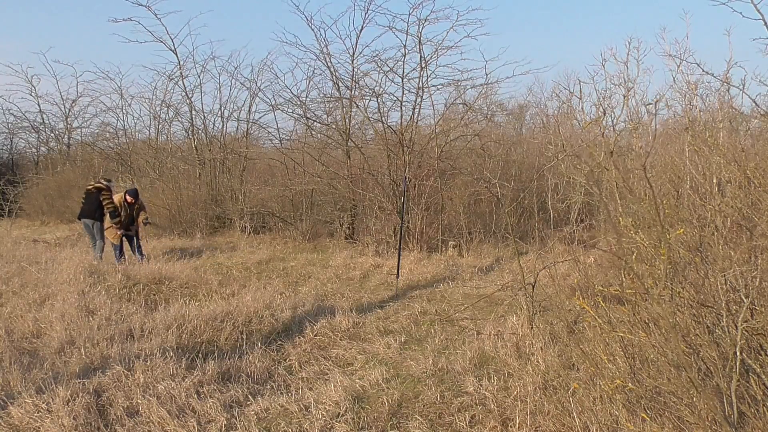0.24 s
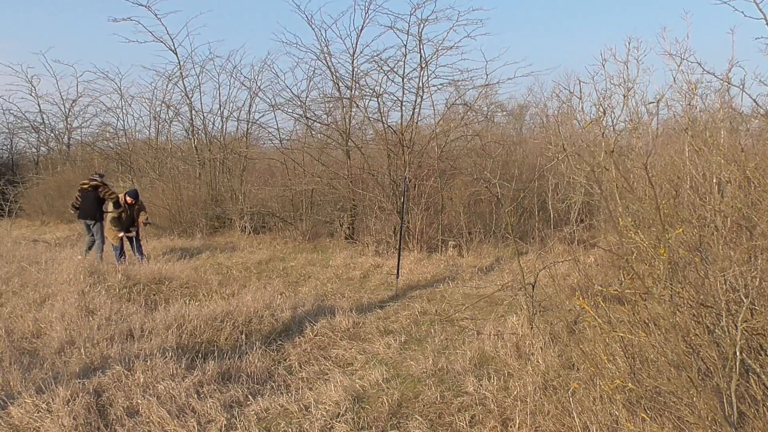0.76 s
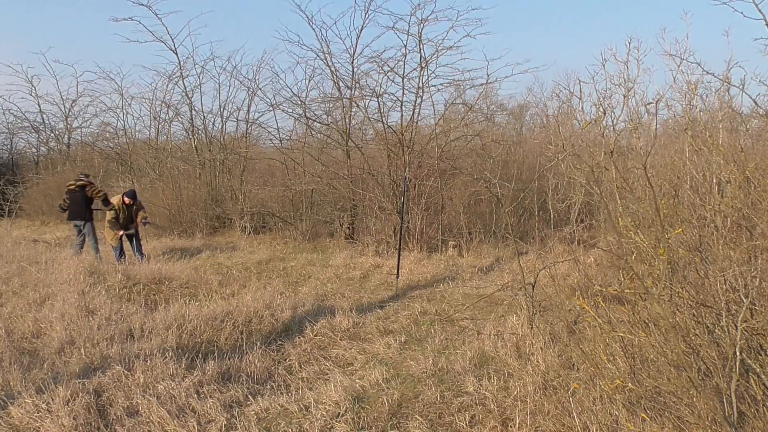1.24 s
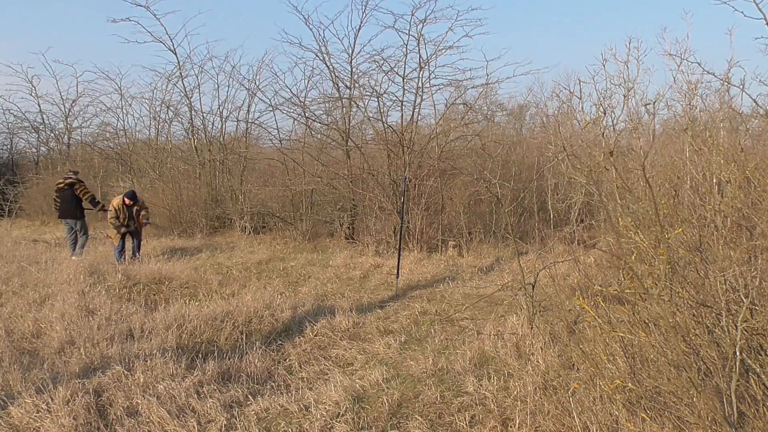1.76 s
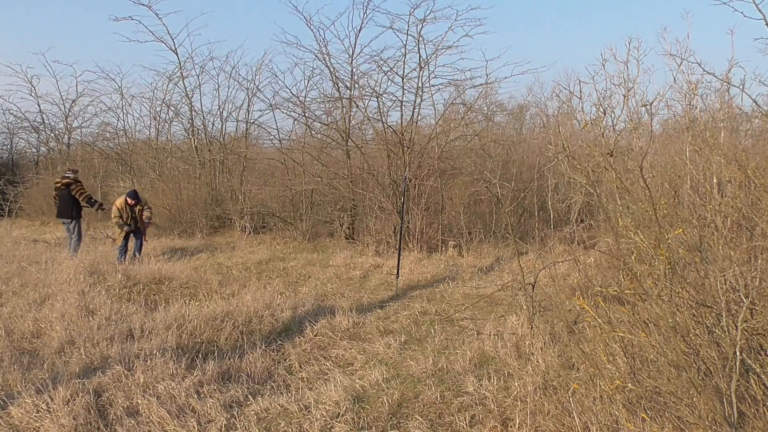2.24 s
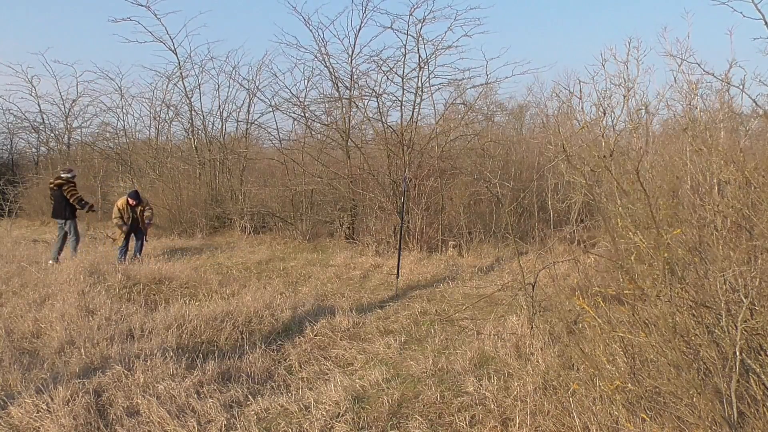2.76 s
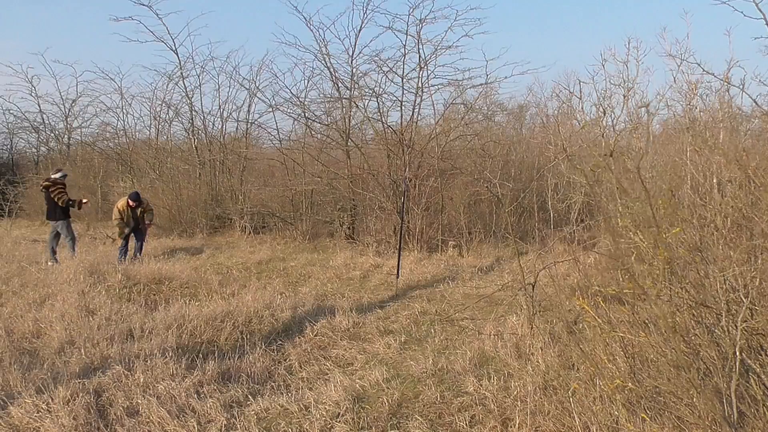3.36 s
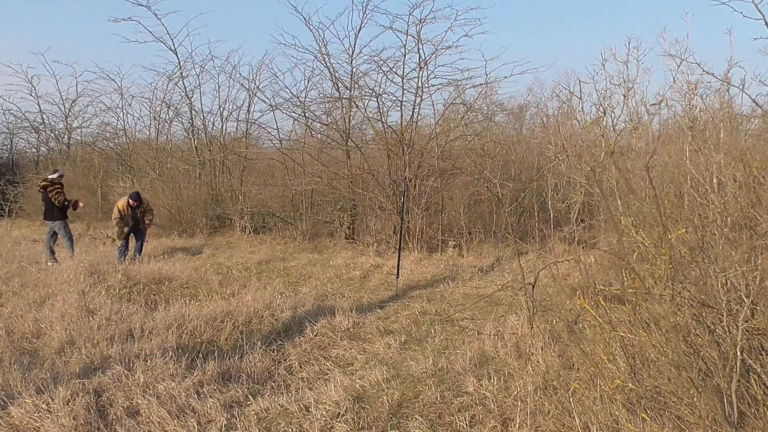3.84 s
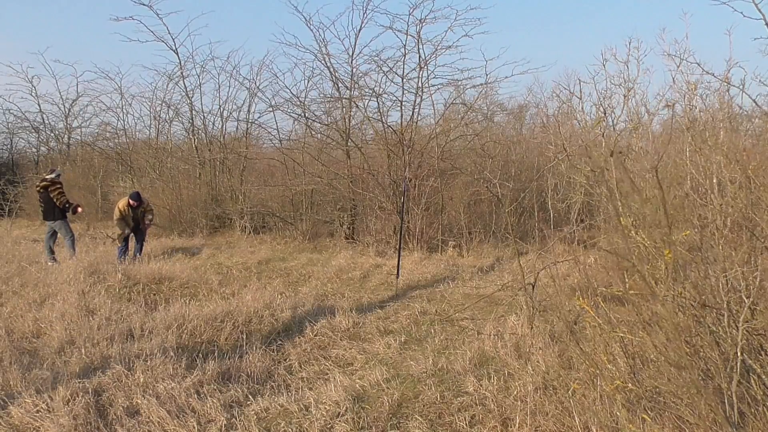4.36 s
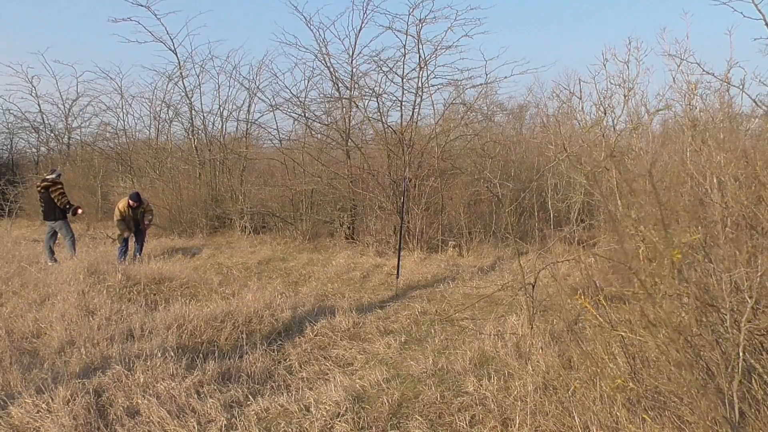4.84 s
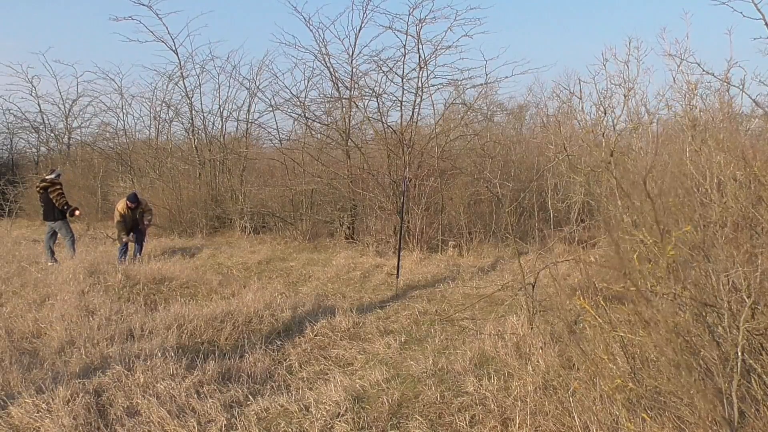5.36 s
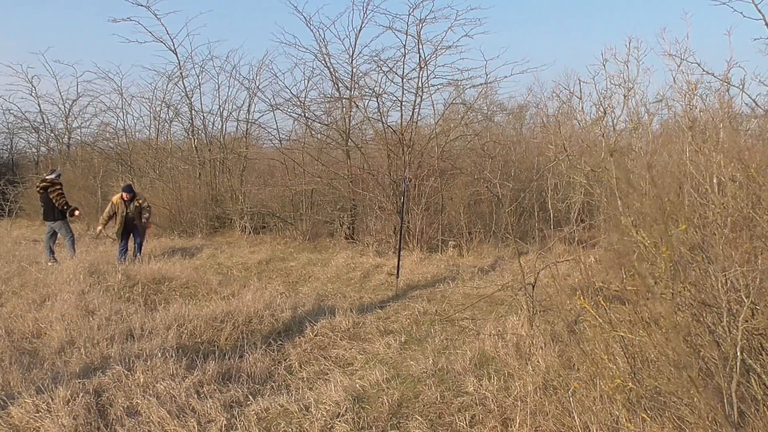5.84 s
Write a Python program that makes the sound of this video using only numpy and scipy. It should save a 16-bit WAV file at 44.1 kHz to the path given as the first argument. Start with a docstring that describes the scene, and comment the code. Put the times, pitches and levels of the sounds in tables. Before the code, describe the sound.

Steady metallic hammering outdoors: one very faint tap, then a dozen or so hard clanks roughly half a second apart, some with a quick bounce. Every clank rings for a fraction of a second and fades into the bushes. Soft distant roar, light grass rustle and faint hiss lie beneath. In the second half, wind pummels the microphone with lumpy low thuds and flaps, and the stereo narrows towards mono.

```python
"""Hammer on an iron stake in a windy field

A hammer drives an iron stake in a dry field some metres left of a camera: filtered noise bursts make crack
and knock, decaying sines make the ring, and scrub behind scatters each blow as a fading noise tail.
Shaped noise makes the wind buffeting the microphone ports, a distant roar, hiss and rustling grass;
short resonant puffs make wind slaps and snapping stalks. From 3.3 s on the stereo image narrows, at times
to near mono."""
import sys
import numpy as np
from scipy import signal
from scipy.fft import rfft, irfft, next_fast_len
from scipy.io import wavfile
from scipy.ndimage import uniform_filter1d

SR = 44100
rng = np.random.default_rng(int(sys.argv[2]) if len(sys.argv) > 2 else 0)


def bounce(signal):
    """Save signal as a 16-bit WAV file at the path given by the first command-line argument."""
    frames = np.transpose(np.atleast_2d(signal))
    limited = np.clip(frames, -1, 1)
    pcm = np.round(limited * 32767).astype(np.int16)
    wavfile.write(sys.argv[1], SR, pcm)


N = 268877
T = np.arange(N) / SR
BLOW_T = np.arange(SR * 3 // 8) / SR  # seconds since a blow
STRIKE_RISE = 1 - np.exp(-BLOW_T / .00025)

# Colour of the scattered sound. Each row: frequency in Hz, level in dB.
SCATTER_COLOUR = [(530, -33), (900, 9.5), (1580, -8.5), (2270, -8), (2470, -5.5), (2790, -17.5),
                  (4020, -5.5), (6310, -5), (6700, -8.5), (7480, -2.5), (11200, -9), (15300, -31.5),
                  (16500, -68)]
# How long the scrub holds a blow. Each row: frequency in Hz, time to fall 60 dB in seconds.
SCRUB_DECAY = [(1000, 0.064), (3000, 0.51), (7000, 0.27), (14000, 0.19)]
# Steady wind on the ports under the buffets. Each row: time in seconds, level in dB,
# left-right balance of all wind in dB.
BREEZE_CURVE = [(0, -43.5, -6), (.18, -62.5, -0.5), (.6, -52.5, 0.5), (1.7, -56.5, -6.5), (2.1, -60.5, 3),
                (2.2, -67.5, 3), (3.25, -60, 0), (3.36, -32, -7), (3.9, -37.5, -12.5), (4.3, -38, -6),
                (4.4, -55, -4.5), (4.6, -31, 0), (4.95, -35.5, -11), (5.04, -45, -2), (5.3, -33, -5.5),
                (6.1, -31, -2.5)]


def gain_of(db):
    """Turn decibels into an amplitude factor."""
    return 10 ** (np.asarray(db) / 20)


def evened(x):
    """Scale to an rms of 1."""
    return x / np.sqrt(np.mean(x ** 2) + 1e-20)


def read(points, hz):
    """Read a frequency curve, straight between its points on a log-frequency axis."""
    f, value = np.transpose(points)
    return np.interp(np.log(hz + 1), np.log(f + 1), value)


def curve(rows, t):
    """Read every column of a table of (time, values..) at the times t."""
    s, *columns = np.transpose(rows)
    return [np.interp(t, s, c) for c in columns]


def sides(pan_db):
    """Left and right gains for a left-right level difference."""
    return gain_of(np.array([pan_db / 2, -pan_db / 2]))


def add(mix, s, sound):
    """Mix a sound in at s seconds, cut at the end of the mix."""
    part = mix[:, round(s * SR):][:, :sound.shape[1]]
    part += sound[:, :part.shape[1]]


def resonate(x, modes):
    """Sum of one-pole resonances with alternating signs, each of gain 1 at its centre before its own level."""
    out = 0
    for k, (hz, width, db) in enumerate(modes):
        r = np.exp(-np.pi * width / SR)
        pole = r * np.exp(2j * np.pi * hz / SR)
        out = out + (-1) ** k * gain_of(db) * signal.lfilter([1 - r], [1, -pole], x).real
    return out


def noise(shape, same, size, patchy_db, flicker_db, field_db=None):
    """Two-channel random short-time spectra with drifting patches and per-frame flicker; mid rms 1."""
    hop = size // 4
    frames, hz = N // hop + 5, np.fft.rfftfreq(size, 1 / SR)
    a, b, c, d, patches = rng.standard_normal((frames, len(hz), 5)).T
    patches = uniform_filter1d(patches, size=size // 128 + 1, axis=0)
    patches = evened(uniform_filter1d(patches, size=8, axis=1))
    flicker = evened(uniform_filter1d(rng.standard_normal((2, 1, frames)), size=3, axis=2))
    # the right channel shares the part "same" with the left; the rest is its own
    same = np.clip(same * np.ones(len(hz)), -1, 1)[:, None]
    left = a + 1j * b
    right = same * left + np.sqrt(1 - same ** 2) * (c + 1j * d)
    z = np.array([left, right])
    z *= gain_of(read(shape, hz)[:, None] + patchy_db * patches + flicker_db * flicker)
    if field_db:
        z *= gain_of(field_db(hz[:, None], np.arange(frames) * hop / SR))
    x = signal.istft(z, nperseg=size, noverlap=size - hop)[1][:, :N]
    return x / np.sqrt(np.mean(x.mean(0) ** 2))


def hammer():
    """Every blow and bounce of the hammer, with the level and phase differences between the camera's ports."""
    # The strikes. Each row: start in seconds, crack in dB, lift of its upper resonances in dB, lift of its top
    # ones in dB, second contact in dB against the first, low knock in dB, knock pitch in Hz, scattered tail in
    # dB, then ring in dB of each of the two pure stake modes, of the pure hammer-head mode and of the broad
    # middle pair.
    strikes = [(0.3934, -49, 4, -16, -17, -44.5, 1690, -66, -68, -62, -91, -84),
               (0.7822, -25, 10, 8.5, -7, -31.5, 1460, -36, -43.5, -47, -70, -59),
               (1.1894, -23.5, 11, 12, -1, -28, 1440, -34, -51.5, -52, -43.5, -60),
               (1.6427, -23, 2.5, 5.5, 0, -27.5, 1190, -34.5, -66, -50, -46.5, -60),
               (2.0969, -23, 0, -1, -4.5, -29.5, 1860, -31.5, -61, -58, -57, -49.5),
               (2.587, -23, -1, -2.5, -5, -32, 2200, -31, -50.5, -44.5, -49.5, -57),
               (3.0724, -24, 0, -9, -4, -29.5, 1700, -30.5, -47, -50, -58, -54),
               (3.1192, -25, 7, -10, -22, -48, 1710, -39.5, -77, -69, -66, -55),
               (3.547, -17.5, 10, 5.5, -15, -32.5, 1860, -35.5, -48.5, -51.5, -45, -55.5),
               (3.6356, -43.5, -4, -1.5, -14, -49, 910, -47, -56, -56, -61.5, -68),
               (4.0613, -25.5, 1.5, 0, 0.5, -31.5, 1410, -32, -59, -44, -70, -58),
               (4.5293, -22, 7.5, 6, -0.5, -31, 1530, -31, -48.5, -45.5, -48.5, -55),
               (4.9903, -19.5, 3, 3.5, -11, -35.5, 1430, -31.5, -56, -44, -48, -54),
               (5.4458, -22, 2.5, 1, -6, -29, 1260, -30.5, -72, -50, -54, -51)]
    # Camera body's colour on a source at the left. Each row: frequency in Hz, left-right balance in dB.
    port_balance = [(2200, 4), (3300, 2), (5300, 0), (6400, -1), (7400, 2.5), (9500, 2), (10500, -5),
                    (12000, -9), (14000, -2)]
    # The same for phase. Each row: frequency in Hz, lead of the left port in radians.
    port_phase = [(1000, .2), (4300, .1), (5300, .3), (7400, 1.2), (8400, 1), (10500, .4), (11700, .7),
                  (12600, 2), (16000, 2)]
    out = np.zeros((2, N))
    for s, *levels in strikes:
        add(out, s, blow(*levels))
    size = next_fast_len(N)
    hz = np.fft.rfftfreq(size, 1 / SR)
    lead = np.exp(.5j * read(port_phase, hz) * np.array([[1], [-1]]))
    return irfft(rfft(out, size) * lead * sides(read(port_balance, hz)), size)[:, :N]


def blow(crack_db, upper_db, top_db, echo_db, knock_db, knock_hz, tail_db, *ring_db):
    """One strike: crack and knock at the contacts, then the stake's modes and the scrub's scatter."""
    # a square, hard blow is brighter
    lift = [(5500, 0), (7000, upper_db), (9000, upper_db), (10500, top_db)]
    out = contacts(crack_db, lift, echo_db, knock_db, knock_hz)
    add(out, 0, minor_partials(tail_db))
    return out + ringing(ring_db, tail_db, lift) + scatter(tail_db)


def contacts(crack_db, lift, echo_db, knock_db, knock_hz):
    """Steel meets steel twice, 2.8 ms apart, exciting a bright crack and a duller knock."""
    # Broad resonances of the crack. Each row: frequency in Hz, width in Hz, level in dB before the lift.
    crack_modes = [(4200, 640, 5.5), (5240, 260, 13), (6100, 160, 4), (7570, 300, 14.5), (8310, 820, 7),
                   (9470, 450, 2.5), (11030, 1150, 1), (13100, 1900, -4), (14900, 2300, -17)]
    # Resonances of the knock. Each row: share of the knock pitch, width in Hz, level in dB.
    knock_modes = [(.6, 636, 3), (1.0, 400, 10.5), (1.5, 1570, 2)]
    t = BLOW_T
    burst = rng.standard_normal((3, len(t)))
    spit = burst[0] + 0.5 * burst[1:]  # noise partly shared by both channels
    first = STRIKE_RISE * gain_of(-60 * t / .007)
    later = np.clip(t - .0028, 0, None)
    second = gain_of(echo_db - 60 * later / 0.014) * (1 - np.exp(-later / 0.00008))
    touch = 4 * np.exp(-((t - .0003) / .000022) ** 2)  # the first touch of steel on steel

    steel = [(hz, width, db + read(lift, hz)) for hz, width, db in crack_modes]
    crack = resonate(spit * (first + second) + touch, steel)

    body = [(share * knock_hz, width, db) for share, width, db in knock_modes]
    thud = spit * STRIKE_RISE * gain_of(-60 * t / 0.034)
    knock = resonate(thud + 1.22 * touch + .6 * spit * second, body)
    knock = signal.sosfilt(signal.butter(2, 600, "high", fs=SR, output="sos"), knock)

    # levels are set over the first few milliseconds
    out = gain_of(crack_db) * crack / crack[:, :SR // 250].std()
    return out + gain_of(knock_db) * knock / knock[:, :SR // 170].std()


def ringing(ring_db, tail_db, lift):
    """The decaying modes of stake and hammer head: broad ones are thick clusters of beating partials, narrow
    ones nearly one tone."""
    # Pitches of the modes, in Hz: three pure ones, the broad middle pair, then the rest.
    mode_hz = [1567, 2513, 6106, 4060, 5075, 7598, 10958, 3740, 4360, 8300, 9690, 12468, 14900]
    # Each row, in the same order: level in dB added to the blow's own, time to fall 60 dB in seconds,
    # spread of its close partials in Hz. Modes after the fifth follow tail level and brightness.
    mode_shape = [(7.5, 0.25, 2.3), (-0.5, 0.46, 1.2), (12, 0.17, 4.5), (5.5, 0.34, 19), (5.5, 0.4, 46.5),
                  (-10.5, 0.24, 24), (-8, 0.14, 22), (-25.5, 0.12, 7.7), (-11.5, 0.22, 32), (-21, 0.19, 69),
                  (-22.5, 0.1, 25), (-23, .16, 15), (-39.5, .15, 15)]
    ring_share = 0.85  # part of a blow's brightness felt by the modes after the fifth
    t = BLOW_T
    early = STRIKE_RISE * (1 + 0.44 * np.exp(-t / 0.0026))  # strongest while the hammer head still shakes
    fade = np.clip((t[-1] - t) / .05, 0, 1)
    levels = [*ring_db, ring_db[-1]]
    levels += [tail_db + ring_share * read(lift, hz) for hz in mode_hz[len(levels):]]
    draws, order = rng.random((len(mode_shape), 2, 7, 1)), np.arange(-3, 4)
    out = 0
    for hz, (db, t60, spread), level, (phase, place) in zip(mode_hz, mode_shape, levels, draws):
        partials = hz + spread * (order[:, None] + place - .5)
        weights = np.where(order, min(spread / 30, 1) * 0.66 ** abs(order), 1)
        cluster = weights @ np.sin(2 * np.pi * (partials * t + phase)) / np.linalg.norm(weights)
        out = out + gain_of(level + db - 60 * t / t60) * cluster
    return out * early * fade


def minor_partials(tail_db):
    """Many short, weak partials of hammer head and stake, different at every blow."""
    place, phase, size = rng.random((3, 48, 1))
    hz, t = 3200 + 9500 * place, BLOW_T[:SR // 8]
    db = read(SCATTER_COLOUR, hz) + 12 * size - 60 * t / (0.27 * read(SCRUB_DECAY, hz))
    partials = gain_of(db) * np.sin(2 * np.pi * (hz * t + phase))
    return gain_of(tail_db - 19.5) * STRIKE_RISE[None, :len(t)] * partials.sum(0)


def scatter(tail_db):
    """The scrub's return: patchy noise whose decay time depends on frequency."""
    burst = rng.standard_normal((3, len(BLOW_T)))
    hz, frames, z = signal.stft(burst[0] + 0.83 * burst[1:], SR, nperseg=256)
    # single trunks return uneven patches of the blow
    patches = evened(uniform_filter1d(rng.standard_normal(z.shape[1:]), size=3, axis=1))
    z *= gain_of(read(SCATTER_COLOUR, hz)[:, None] + 3.0 * patches)
    z /= np.sqrt(np.mean(abs(z) ** 2) * len(hz))
    z *= gain_of(-60 * frames / read(SCRUB_DECAY, hz)[:, None])
    tail = signal.istft(z, SR, nperseg=256)[1][:, :len(BLOW_T)]
    return gain_of(tail_db - 7.0) * tail * (1 - np.exp(-BLOW_T / 0.00093))


def wind():
    """All wind on the ports, buffeting and slaps, under one moving left-right balance."""
    out = buffeting()
    add_slaps(out)
    return out * sides(curve(BREEZE_CURVE, T)[1])


def buffeting():
    """Lumpy low turbulence, partly opposed at the two ports, brighter when strong."""
    # Colour of the turbulence before brightness. Each row: frequency in Hz, level in dB.
    air_colour = [(12, -55), (20, -21), (43, -15), (86, -1.5), (226, 1), (508, -16), (544, -19), (583, -18),
                  (1340, -35), (1810, -52.5), (5000, -72), (6500, -91), (11000, -120)]
    # Share of the brightness felt. Each row: frequency in Hz, factor.
    bright_share = [(60, -0.73), (200, 0.26), (500, 0.42), (2000, 0.95)]
    bright_per_db = 0.6252  # dB of brightness per dB of wind

    def brightness(hz, t):
        gust_db, bright_db = gusts(t)
        return read(bright_share, hz) * (bright_db + bright_per_db * (gust_db + 13))

    air = noise(air_colour, -0.4, size=512, patchy_db=0.0, flicker_db=4.5, field_db=brightness)
    # swells longer than about 40 ms are roughly halved in dB, leaving their level more to the gust curve
    lumps = uniform_filter1d(air.mean(0) ** 2, size=SR // 25) + 1e-3
    air = air / lumps ** 0.23
    steps = T[::SR // 500]
    level_db = np.interp(T, steps, gusts(steps)[0])
    return air / air.mean(0).std() * gain_of(level_db)


def gusts(t):
    """Wind level and brightness in dB: the breeze plus buffets that rise, hold and fall."""
    # Each row: start of the hold in seconds, its length in seconds, level in dB, brightness in dB.
    buffet_rows = [(0.25, 0.039, -47.5, -9), (0.399, 0.025, -48, -6.5), (0.44, 0.025, -38, -11.5),
                   (0.658, .03, -50.5, 6), (0.834, 0.028, -47.5, -8), (1.1, 0.033, -51, 2),
                   (1.355, 0.051, -50, -5), (1.495, .05, -45.5, -1.5), (1.805, 0.038, -44, -10),
                   (2.572, 0.027, -38.5, 10), (3.012, 0.046, -38.5, -7), (3.172, 0.023, -47, -21.5),
                   (3.421, 0.02, -15, 10), (3.461, 0.049, -17, -5.5), (3.516, 0.087, -22.5, 1),
                   (3.616, 0.15, -18.5, 7.5), (3.719, .11, -20, 8), (3.838, 0.092, -31.5, -1),
                   (3.934, 0.023, -20.5, 3), (3.964, 0.097, -29, -3), (4.294, .04, -29.5, 4),
                   (4.494, 0.0075, -17.5, -8.5), (4.67, .02, -23, -0.5), (4.741, 0.08, -25.5, 5),
                   (4.951, 0.043, -29.5, 1.5), (5.1, 0.03, -23.5, 0.5), (5.208, 0.022, -23, 5.5),
                   (5.26, 0.03, -16, -5.5), (5.313, 0.041, -22.5, 5), (5.426, 0.098, -25.5, -3),
                   (5.492, .12, -22.5, 6.5), (5.665, 0.02, -40.5, -19), (5.75, 0.075, -22.5, 1.5),
                   (5.846, 0.024, -23, 16), (5.983, .1, -25, -1)]
    rise_s, fall_s = 0.016, 0.014  # time to gain or lose 20 dB before and after the hold
    breeze_bright_db = 2.5
    start, length, db, bright_db = np.transpose(buffet_rows)[:, :, None]
    away = np.maximum(start - t, 0) / rise_s + np.maximum(t - start - length, 0) / fall_s
    power = gain_of(db - 20 * away) ** 2
    breeze = gain_of(curve(BREEZE_CURVE, t)[0]) ** 2
    total = power.sum(0) + breeze
    return 10 * np.log10(total), ((power * bright_db).sum(0) + breeze * breeze_bright_db) / total


def add_slaps(out):
    """Sharp pressure slaps: a one-sided noisy puff through three low resonances."""
    # Each row: start in seconds, peak in dB before the wind's balance.
    slap_rows = [(3.42, -13), (3.435, -15), (3.479, -20), (3.637, -3.5), (3.692, -10.5), (3.754, -15.5),
                 (3.777, -16.5), (3.938, -9.5), (4.489, -21), (4.685, -22), (4.956, -21), (5.106, -26),
                 (5.27, -13), (5.329, -15), (5.505, -14), (5.519, -19), (5.559, -26), (5.759, -21),
                 (5.821, -19), (5.856, -7.5)]
    modes = [(231, 403, -2.0), (538, 275, 5.5), (1120, 430, -13.5)]  # Hz, width in Hz, dB
    soften = signal.butter(4, 2200, fs=SR, output="sos")
    t = np.arange(SR // 20) / SR
    for (s, db), puff in zip(slap_rows, rng.standard_normal((len(slap_rows), 2, len(t)))):
        pressure = (puff + 1.56) * t / .003 * np.exp(-t / 0.0017)
        slap = signal.sosfilt(soften, resonate(pressure, modes))
        add(out, s, gain_of(db) * slap / abs(slap).max())


def grass():
    """Rustling grass: high, wide, patchy noise that swells and ebbs."""
    # Each row: frequency in Hz, level in dB.
    grass_colour = [(2500, -29), (4000, -1.5), (5200, -6.5), (6300, -7.5), (8500, -2.5), (11000, -4.5),
                    (13000, -7.5), (15500, -32.5)]
    # Each row: time in seconds, level in dB.
    rustle_level = [(0.0, -72), (0.63, -71), (0.78, -66.5), (1.24, -70.5), (1.39, -65), (1.7, -66),
                    (2.38, -69), (3.4, -64), (3.7, -71.5), (4.24, -64), (4.69, -65), (5.4, -67),
                    (6.1, -68.5)]
    rustle = noise(grass_colour, .1, size=256, patchy_db=2.5, flicker_db=-1.0)
    return gain_of(curve(rustle_level, T)[0]) * rustle


def stalks():
    """Dry stalks snap: very short noise puffs through two high resonances."""
    # Each row: start in seconds, peak in dB before panning, left-right balance in dB.
    snap_rows = [(1.596, -50, -0.5), (1.8497, -50, 0.0), (1.929, -49, -0.5), (1.9607, -51, -1.5),
                 (2.7267, -51, 13), (2.8783, -52, 9), (2.9986, -49, 2.5), (3.929, -52.5, 6),
                 (4.1614, -48, 20), (4.2103, -52, 4), (5.214, -52, 1.5), (5.943, -50, 0.0)]
    out = np.zeros((2, N))
    t = np.arange(SR // 50) / SR
    for (s, db, pan), puff in zip(snap_rows, rng.standard_normal((len(snap_rows), len(t)))):
        snap = resonate(puff * gain_of(-60 * t / 0.023), [(4800, 1600, 4.8), (9900, 2400, 6.3)])
        add(out, s, gain_of(db) * sides(pan)[:, None] * snap / abs(snap).max())
    return out


def roar():
    """Distant roar: low noise, nearly alike on both sides in the bass and wider above."""
    # Each row: frequency in Hz, level in dB.
    roar_colour = [(24, -61), (40, -23), (140, -7), (182, 2), (265, -1), (296, -18), (319, 1), (407, -1.5),
                   (741, -3.5), (1450, -12.5), (1900, -20), (3500, -28.5), (4550, -74.5), (7700, -120)]
    # Each row: time in seconds, level in dB.
    roar_level = [(0, -56.5), (.7, -55.5), (1, -53.5), (2, -51.5), (2.8, -50), (3.3, -45.5), (4.3, -48),
                  (5, -51.5), (6.1, -50.5)]
    # Each row: frequency in Hz, left-right likeness from 0 to 1.
    roar_likeness = [(100, 1), (300, 0.91), (700, 0.82), (1500, 0.51), (3500, 0.18)]
    same = read(roar_likeness, np.fft.rfftfreq(1024, 1 / SR))
    rumble = noise(roar_colour, same, size=1024, patchy_db=1.5, flicker_db=0.0)
    return rumble * gain_of(curve(roar_level, T)[0])


def hiss():
    """Microphone hiss: noise of constant level, nearly unlike on the two sides."""
    # Each row: frequency in Hz, level in dB.
    hiss_colour = [(1000, -29.5), (1500, -24), (2300, -7), (3700, -2.5), (5000, -3.5), (6800, -21.5),
                   (9000, -20), (12000, -14), (15400, -4.5), (15800, -39)]
    return gain_of(-74) * noise(hiss_colour, .15, size=512, patchy_db=2.5, flicker_db=-1.5)


def scene():
    """Hammer in front, wind on the ports, then the field and the hiss."""
    return hammer() + wind() + grass() + stalks() + roar() + hiss()


def record(dry):
    """Stereo width moves in two bands; then a low cut, rounded peaks and a band limit."""
    # Gain on the left-right difference. Each row: time in seconds, dB below the 2200 Hz split, dB above it.
    width_curve = [(0, 3, -1.5), (3.3, 3.5, 1), (3.7, -3.5, 0), (4.1, -12.5, -3.5), (5.28, -15, -7),
                   (5.34, -71, -45), (5.68, -61, -11), (5.76, -25, -13), (5.95, -24, -10), (6.02, -64, -19),
                   (6.1, -61, -19)]
    mid, side = (dry[0] + dry[1]) / 2, (dry[0] - dry[1]) / 2
    low = signal.sosfiltfilt(signal.butter(2, 2200, fs=SR, output="sos"), side)
    low_db, high_db = curve(width_curve, T)
    side = low * gain_of(low_db) + (side - low) * gain_of(high_db)
    both = signal.sosfilt(signal.butter(2, 66, "high", fs=SR, output="sos"), [mid + side, mid - side])
    both = both / (1 + abs(both / .98) ** 6) ** (1 / 6)
    band_limit = signal.firwin(511, 16600, window=("kaiser", 9), fs=SR)
    return signal.oaconvolve(both, band_limit[None], "same")


dry = scene()
out = record(dry)
bounce(out)
```